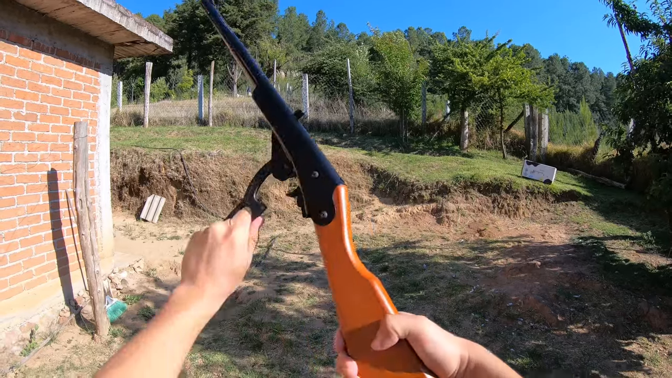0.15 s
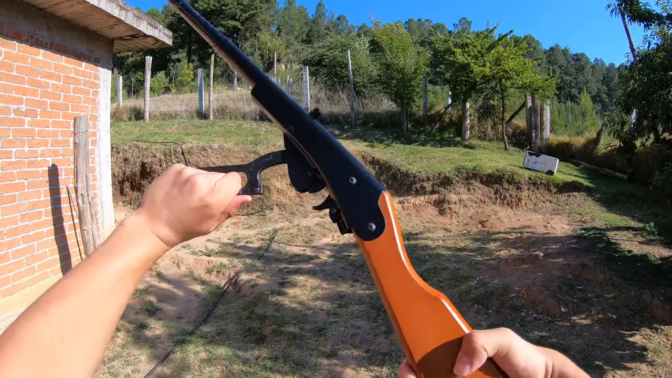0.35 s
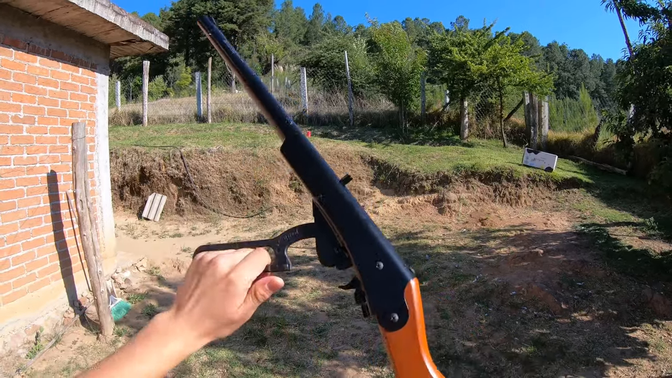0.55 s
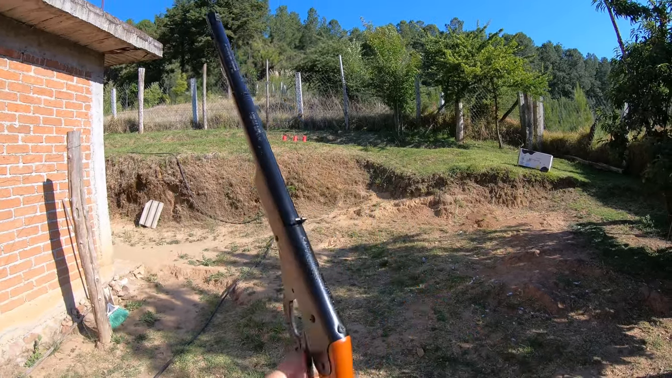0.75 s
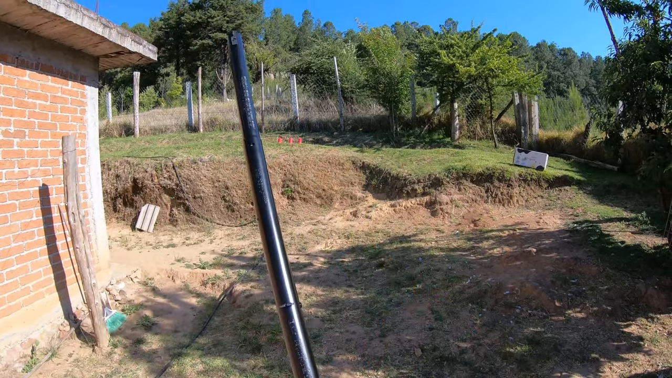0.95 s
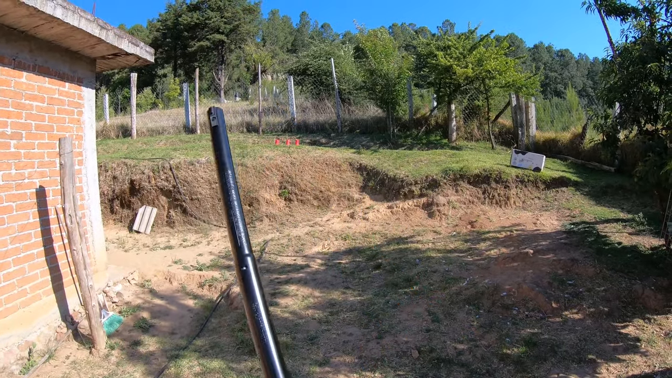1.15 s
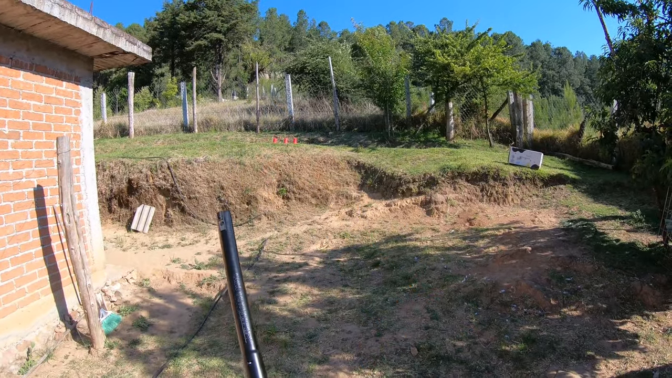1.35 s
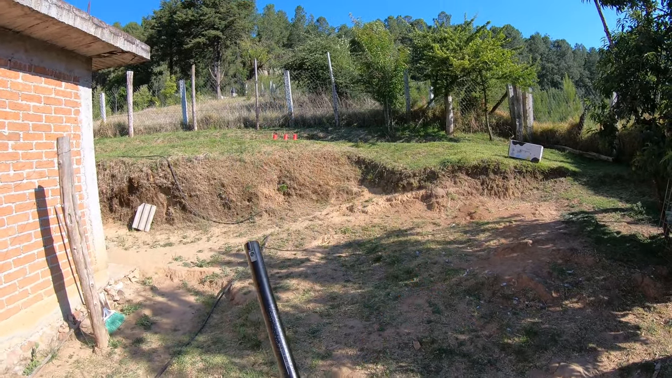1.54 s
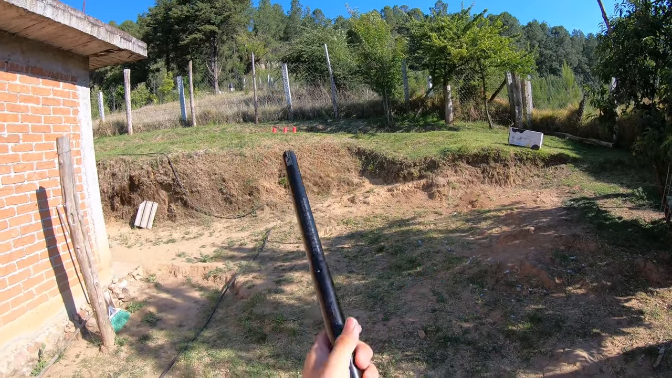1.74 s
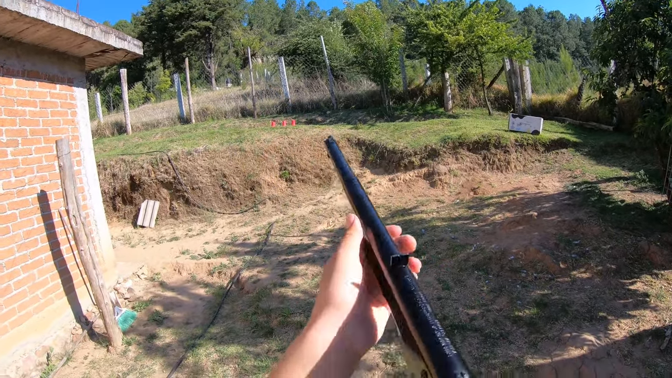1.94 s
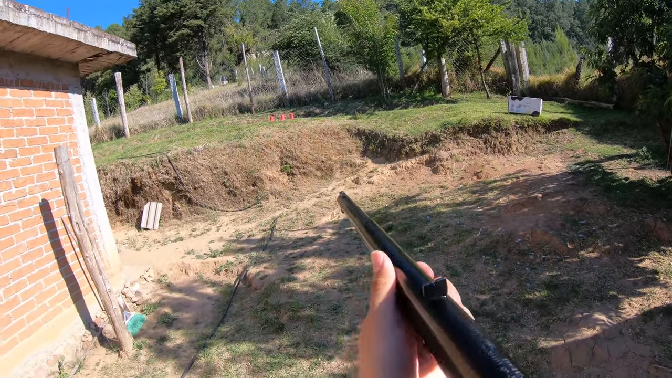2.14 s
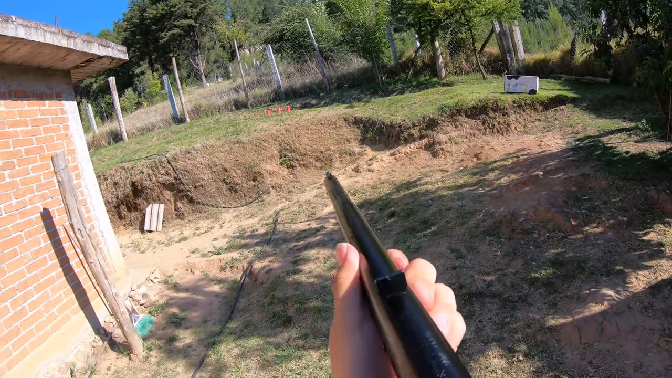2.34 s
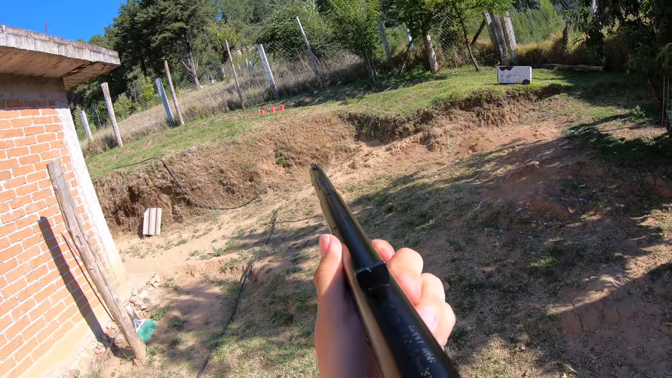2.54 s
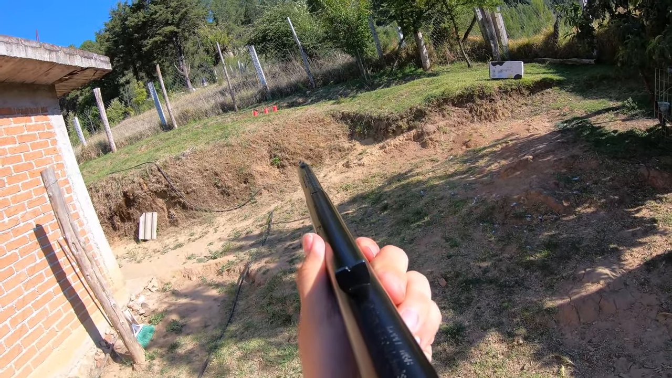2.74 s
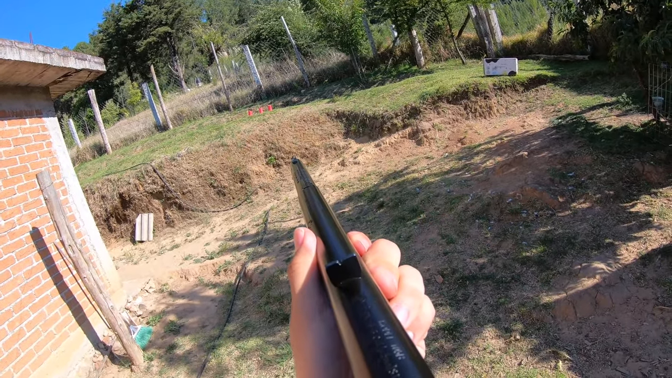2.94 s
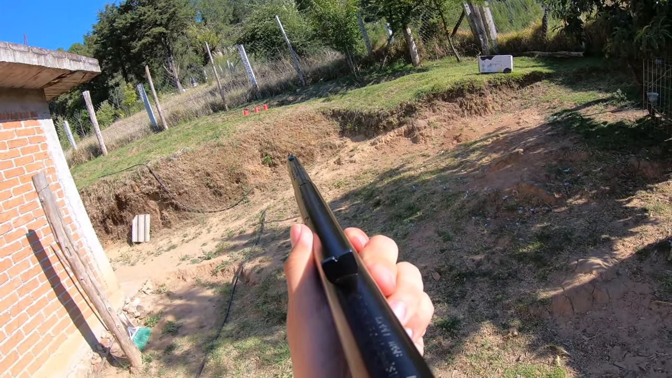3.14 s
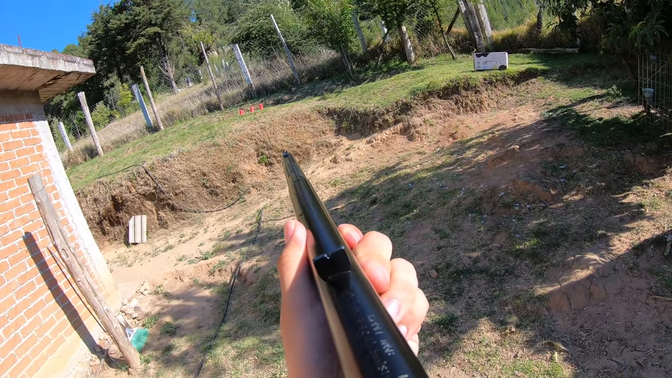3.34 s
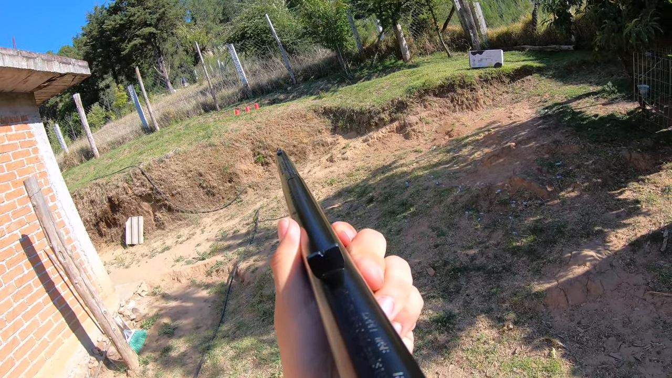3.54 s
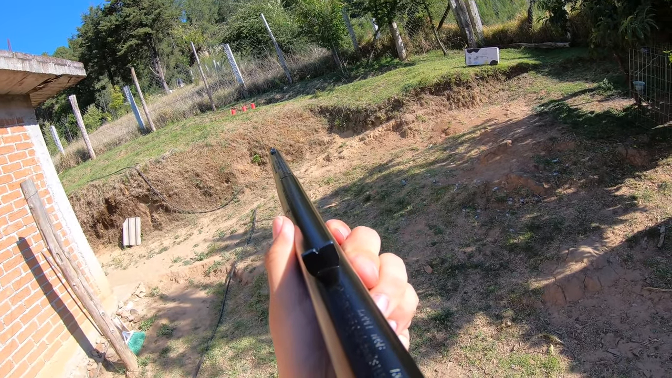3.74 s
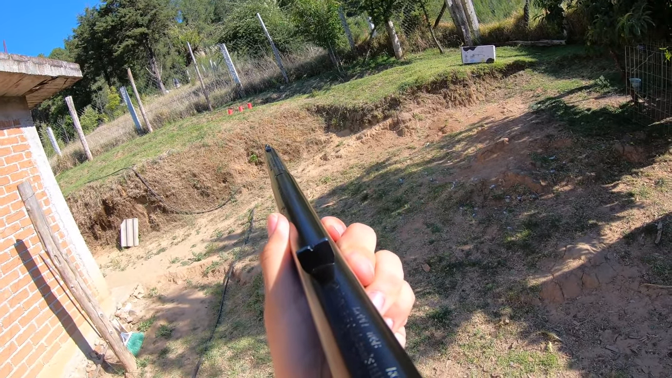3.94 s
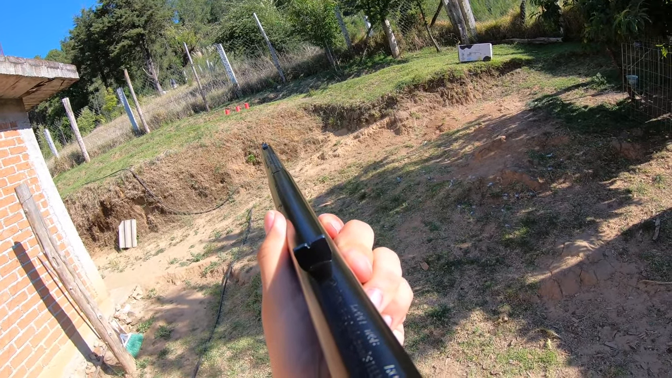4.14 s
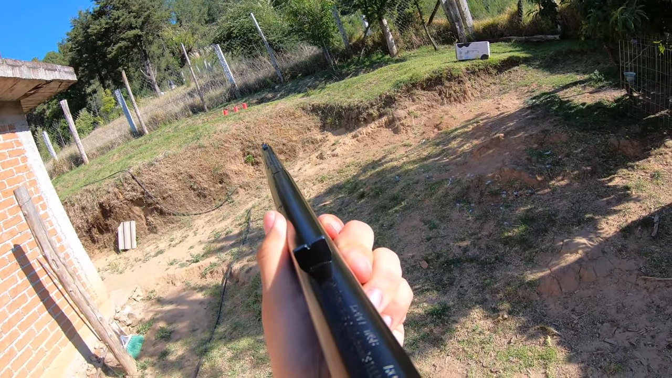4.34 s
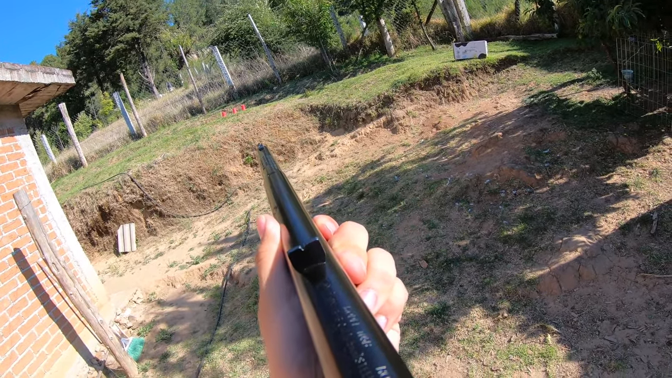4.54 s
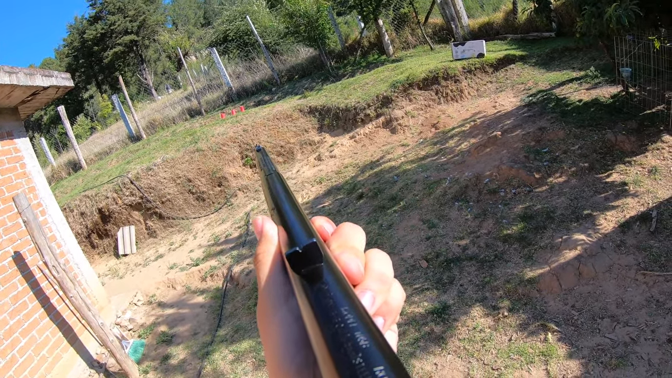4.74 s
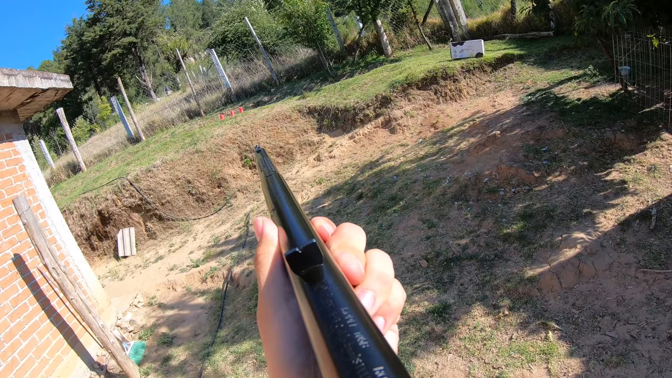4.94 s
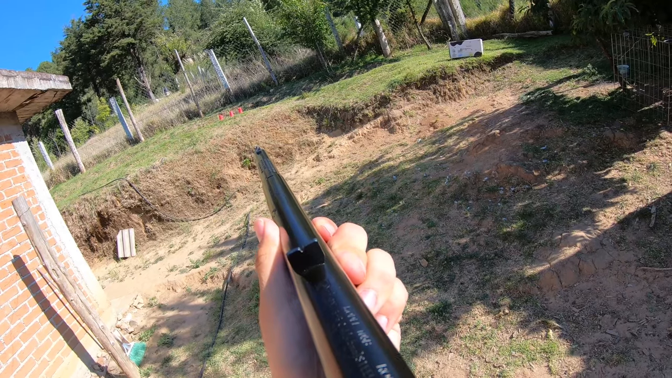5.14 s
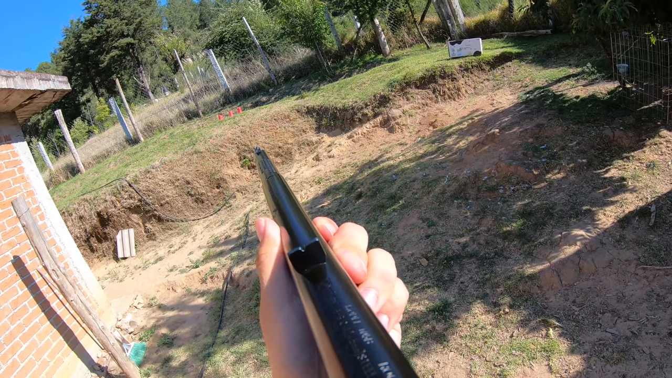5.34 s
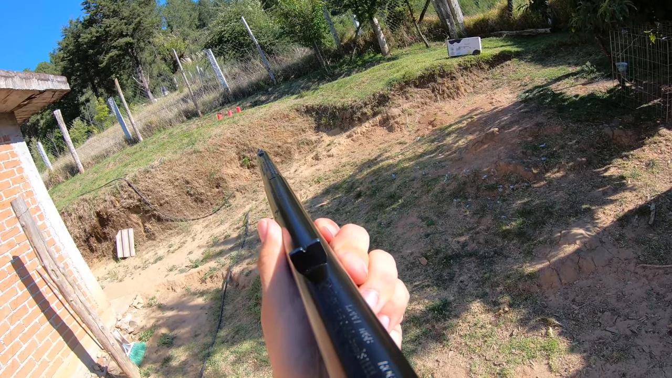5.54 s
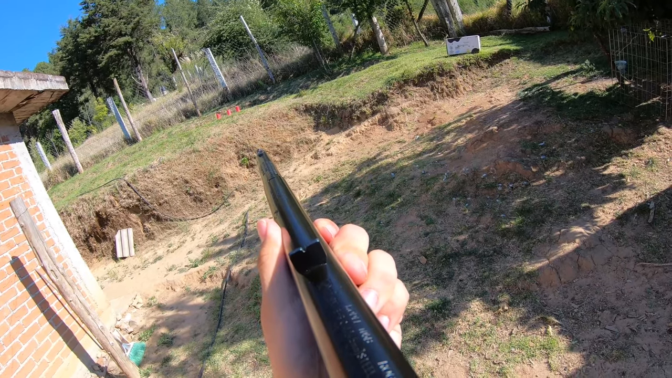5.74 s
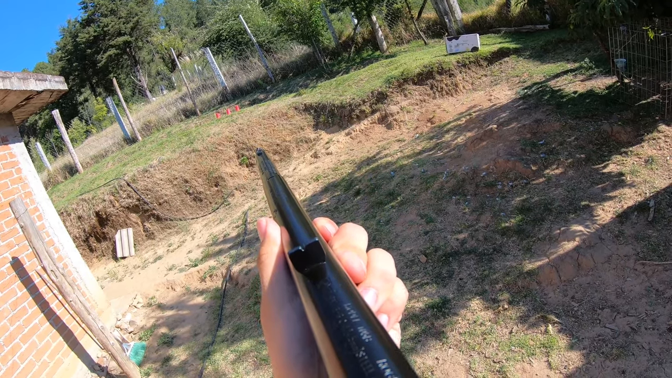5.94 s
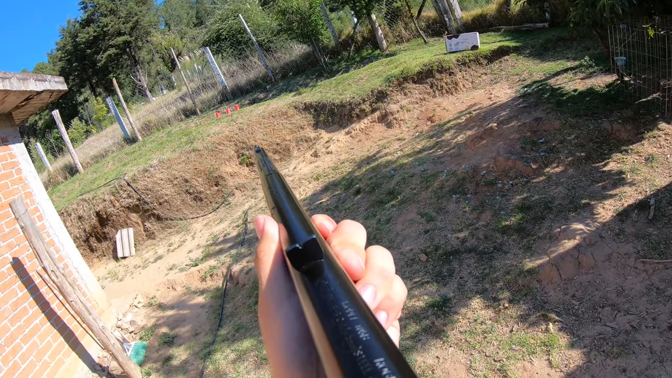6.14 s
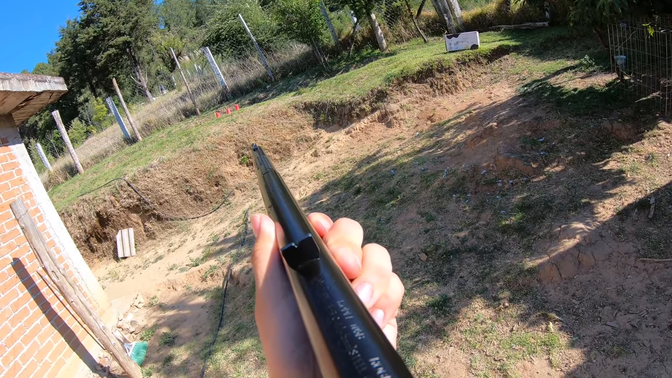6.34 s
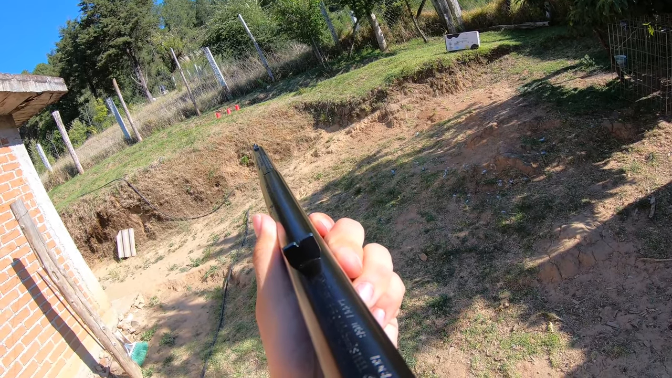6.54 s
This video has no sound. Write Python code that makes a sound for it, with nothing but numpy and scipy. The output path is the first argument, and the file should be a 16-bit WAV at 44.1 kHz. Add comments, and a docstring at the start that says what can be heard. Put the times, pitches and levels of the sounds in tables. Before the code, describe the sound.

A lever-action air gun is worked at arm's length outdoors: gritty scraping, quick bright ratchet teeth, a brief gap, then two hard clacks as the catch trips and the lever shuts. Loose parts tick and hands knock lightly. Soft crackly cloth rubbing comes next and dies away, leaving gliding bird chirps over a faint low hum and open-air rush. The sound is close and dry, with barely any echo.

```python
"""A low outdoor drone and a little wind on the microphone, then a light tick of loose parts close by.
At arm's length, in a yard beside a brick shed, a lever-action BB gun is cocked, then raised to aim:
the pawl drops and rebounds on ratchet teeth while the spring rasps, the lever trips its catch and snaps shut.
The stock rubs over a shirt in fading strokes, as bursts of tiny slips; small birds twitter in gliding tones.
Struck steel is a sum of decaying modes with chattering noise; wind, rush and rumble are coloured noise."""
import sys
import numpy as np
from scipy import signal
from scipy.fft import rfft, irfft, next_fast_len
from scipy.io import wavfile
from scipy.ndimage import uniform_filter1d

SR = 44100
rng = np.random.default_rng(int(sys.argv[2]) if len(sys.argv) > 2 else 0)


def to_wav(s):
    """Save 16-bit WAV."""
    ch = np.atleast_2d(s).T  # columns
    pcm = np.round(np.clip(ch, -1, 1) * 32767)  # PCM
    wavfile.write(sys.argv[1], SR, pcm.astype(np.int16))


N = 290396
TIME = np.arange(N) / SR   # seconds

# Modes of the struck receiver. Each row: pitch in Hz, relative level in dB, t60 in seconds.
RECEIVER_MODES = [(1080, -13, 0.066), (1440, -21.5, .015), (2240, -30.5, .025), (2852, -17.5, 0.013),
                  (3810, -6.5, 0.015), (4430, -6, .012), (4290, -5, 0.017), (4900, -7.5, 0.014),
                  (5670, -20.5, 0.036), (6450, -14, .010), (6530, -19.5, 0.01), (7674, -28, 0.012),
                  (10200, -18.5, 0.011)]
# Colour of the scrape and of the light ticks. Each row: frequency in Hz, relative density in dB per Hz.
RASP_COLOUR = [(290, -53.5), (500, -21), (800, -12.5), (1150, -12), (1600, -1.5), (2000, -7), (3200, -4.5),
               (5000, -0.5), (7400, -4), (8100, -10.5), (10000, -6.5), (11300, -19.5), (14000, -21),
               (16000, -40.5)]
# Left-right likeness of the gun. Each row: frequency in Hz, correlation from 0 to 1.
GUN_LIKENESS = [(500, 1), (1400, 0.38), (3200, 0.86), (5000, 0.27), (7000, 0.17), (10000, 0.033)]
# Left-right likeness of wind and open air. Each row: frequency in Hz, correlation from 0 to 1.
AIR_LIKENESS = [(30, .4), (80, 0.72), (250, 0.87), (700, 0.38), (1500, 0.14), (4000, 0.28), (10000, 0.033)]


def from_db(db):
    """Decibels to gain."""
    return 10 ** (np.asarray(db) / 20)


def left_right(db):
    """Gains of the two ports, db apart; the left is louder when db is positive."""
    return from_db(db * np.array([[.5], [-.5]]))


def rms_one(x):
    """Scale to unit rms."""
    return x / np.sqrt(np.mean(x ** 2) + 1e-20)


def at_hz(points, hz):
    """Read a table on a log-frequency axis."""
    f, value = np.transpose(points)
    return np.interp(np.log(hz + 1), np.log(f), value)


def level(curve):
    """Gain over time from a curve of seconds and dB, held at both ends."""
    return from_db(np.interp(TIME, *np.transpose(curve)))


def drift(rate):
    """Chance wandering of rms 1: straight lines between random values drawn rate times a second."""
    knots = rng.standard_normal(N // 8)
    return rms_one(np.interp(TIME * rate, np.arange(len(knots)), knots))


def unsteady(depth_db, per_s):
    """A gain that wavers by chance."""
    return from_db(depth_db * drift(per_s))


def add(out, s, sound):
    """Mix a short sound in at time s."""
    i = max(int(round(s * SR)), 0)
    out[..., i:i + sound.shape[-1]] += sound[..., :max(N - i, 0)]


def colour(x, spectrum):
    """Causal (minimum-phase) filter with the given spectrum; white noise keeps its power."""
    size = 2 ** 13
    gain = rms_one(from_db(at_hz(spectrum, np.arange(size // 2 + 1) * SR / size)))
    # folding the cepstrum onto positive time gives the minimum phase
    cepstrum = irfft(np.log(gain))
    cepstrum[1:size // 2] *= 2
    cepstrum[size // 2 + 1:] = 0
    impulse = irfft(np.exp(rfft(cepstrum)))
    return signal.oaconvolve(x, impulse[None], axes=-1)[:, :N]


def stereo(pair, likeness):
    """Blend two unrelated signals into left and right with a correlation for each frequency."""
    size = next_fast_len(N)
    mid, side = rfft(pair, size)
    alike = np.clip(at_hz(likeness, np.arange(len(mid)) * SR / size), -.99, .99)
    common = np.sqrt((1 + alike) / 2) * mid
    opposed = np.sqrt((1 - alike) / 2) * side * [[1], [-1]]
    return irfft(common + opposed, size)[:, :N]


def noise(likeness):
    """White stereo noise."""
    return stereo(rng.standard_normal((2, N)), likeness)


def narrow(hz, width_hz):
    """Noise in one narrow resonance; rms 1."""
    band = signal.butter(2, [hz - width_hz, hz + width_hz], "band", fs=SR, output="sos")
    return rms_one(signal.sosfilt(band, rng.standard_normal(N + SR))[SR:])   # the first second settles


def scatter(x, t60, top_hz):
    """Diffuse returns from bank, fence and trees: a decaying noise tail of unit energy."""
    t = TIME[:SR]
    tail = rng.standard_normal((2, SR)) * from_db(-60 * t / t60) * (1 - np.exp(-t / .008))
    tail = signal.sosfilt(signal.butter(1, top_hz, fs=SR, output="sos"), tail)
    return signal.oaconvolve(x, rms_one(tail) / np.sqrt(SR), axes=-1)[:, :N]


def wind(gain_db, pan_db):
    """Wind lumps on the microphone ports: low noise under a gust curve."""
    # Colour of the eddies. Each row: frequency in Hz, relative density in dB per Hz.
    eddy_colour = [(15, 6), (28, 17.5), (40, 16), (50, 11.5), (62, -3), (100, -4), (200, -23), (500, -47),
                   (4000, -74.5)]
    # Strength on the ports. Each row: time in seconds, level in dB before the wind gain.
    gusts = [(0.0, -52), (0.29, -47), (0.48, -38), (0.51, -48.5), (1.52, -57), (2.56, -50), (2.58, -62.5),
             (4.21, -56.5), (4.49, -44), (4.95, -57.5), (5.66, -51.5), (5.83, -63), (6.52, -52.5),
             (6.58, -58)]
    eddies = colour(noise(AIR_LIKENESS), eddy_colour)
    # even, so the gusts set the level
    eddies = eddies / np.sqrt(uniform_filter1d(np.mean(eddies ** 2, axis=0), size=SR // 8))
    strength = level(gusts) * unsteady(depth_db=-0.5, per_s=13)
    return from_db(gain_db) * left_right(pan_db) * strength * eddies


def drone(gain_db, side_db):
    """A low tone that wavers in pitch and throbs in strength, with a slight flutter between the ports."""
    # Swell of the drone. Each row: time in seconds, level in dB before the drone gain.
    swell = [(0.0, -75), (0.64, -52), (0.84, -72), (1.04, -50), (2.77, -68.5), (2.82, -52.5), (3.3, -74.5),
             (3.68, -49.5), (4.45, -43), (4.58, -51.5), (5.13, -55), (5.24, -39), (5.54, -48.5),
             (5.81, -40.5), (5.96, -64.5), (6.23, -44.5), (6.27, -61.5), (6.58, -45.5)]
    centre_hz, wander_hz = 77.9, 7.1   # the wander is an rms value
    pitch = centre_hz + wander_hz * drift(30)
    tone = np.sqrt(2) * np.sin(2 * np.pi * np.cumsum(pitch) / SR)
    throb = from_db(5 * np.tanh(drift(17)) - 1.5)
    flutter = from_db(side_db) * narrow(centre_hz, 15) * np.array([[1], [-1]])
    return from_db(gain_db) * level(swell) * throb * (tone + flutter)


def outdoors(rush_db, rumble_db):
    """The far rush of the countryside and a low rumble as coloured noise, with a faint hollow hum."""
    # Colours of rush and rumble. Each row: frequency in Hz, relative density in dB per Hz.
    rush_colour, rumble_colour = [(76, -30.5), (130, 4.5), (198, -4), (402, -15.5), (462, -16), (812, -6),
                                  (974, -11), (1240, -13), (2460, -27.5), (2670, -30.5), (5390, -41),
                                  (7750, -39), (9290, -44), (10300, -77), (16000, -68.5)], [(70, -20.5), (140, -1), (260, -3), (430, -2.5),
                                                      (700, -12), (1500, -39.5), (4000, -70)]
    # Levels of rush and rumble. Each row: time in seconds, level in dB before the layer's gain.
    rush_curve, rumble_curve = [(1.1, -64.5), (1.88, -64), (2.15, -65.5), (3.27, -66), (4.32, -64.5),
                                (5.6, -63.5), (6.0, -67.5), (6.58, -67)], [(1.15, -66), (3.75, -68.5), (4.07, -62.5), (4.55, -56.5),
                                              (4.66, -64.5), (5.99, -63), (6.31, -70), (6.58, -64.5)]
    # Level of the hum. Each row: time in seconds, level in dB.
    hum_curve = [(1.7, -76.5), (2.77, -73.5), (2.81, -65), (3.59, -64.5), (3.62, -75), (4.15, -55),
                 (4.25, -77), (4.35, -61), (6.58, -73.5)]
    # Resonances of the hum. Each row: centre in Hz, half-width in Hz, dB relative to the hum level.
    hum_bands = [(103, 22, 2), (170, 15, -7), (228, 12, -2)]
    rush = from_db(rush_db) * level(rush_curve) * colour(noise(AIR_LIKENESS), rush_colour)
    hum = level(hum_curve) * sum(from_db(db) * narrow(hz, width) for hz, width, db in hum_bands)
    rumble = from_db(rumble_db) * level(rumble_curve) * colour(noise(AIR_LIKENESS), rumble_colour)
    return rush + hum + rumble


def body(x):
    """Each resonance of the hollow gun lifts its own band of all that rubs on it."""
    # Resonances of the gun. Each row: centre in Hz, width in Hz, boost in dB.
    resonances = [(1290, 320, 4), (2650, 67, 7.5), (3073, 150, 6), (3700, 280, 3.5), (3940, 150, 2),
                  (4430, 380, 2), (5600, 300, 1), (6560, 320, 1.5), (7440, 330, 4.5), (8780, 490, 5.5)]
    for hz, width_hz, db in resonances:
        band = signal.lfilter(*signal.iirpeak(hz, hz / width_hz, fs=SR), x)
        x = x + (from_db(db) - 1) * band
    return x


def friction(spectrum, likeness, slips_per_s, size_db, judder_db, judder_hz, hiss_db):
    """Countless tiny slips of uneven size, bunched by stick and slip, over a smooth hiss; rms 1."""
    sizes_db = np.minimum(size_db * rng.exponential(1, N), 17)
    sizes = from_db(sizes_db) * (rng.random(N) < slips_per_s / SR)
    slips = stereo(rms_one(sizes * rng.choice([-1, 1], (2, N))), likeness)
    hiss = from_db(hiss_db) * noise(likeness)
    force = (slips + hiss) * unsteady(judder_db, judder_hz)
    return rms_one(body(colour(force, spectrum)))


def snags(spectrum, likeness, per_s, size_db):
    """Rough spots catch and let go: lone crackles, each a few ms long; rms 1."""
    decay_s = .0015   # time constant of one crackle
    sizes_db = np.minimum(size_db * rng.exponential(1, N), 6)
    clicks = from_db(sizes_db) * (rng.random(N) < per_s / SR)
    bursts = signal.lfilter([1], [1, -np.exp(-1 / (decay_s * SR))], clicks + 1e-18)
    return rms_one(body(colour(bursts * noise(likeness), spectrum)))


def strokes(rows, attack_s, release_s):
    """Gain of rubbing strokes: each swells by 20 dB in attack_s, holds, and sinks by 20 dB in release_s."""
    power = 0
    for s, hold, db in rows:
        outside = np.maximum(s - TIME, 0) / attack_s + np.maximum(TIME - s - hold, 0) / release_s
        power = power + from_db(db - 20 * np.minimum(outside, 10)) ** 2
    return np.sqrt(power)


def rasp(gain_db, pan_db):
    """The spring and lever scrape inside the receiver, then the hand slides along the gun."""
    # Friction rises as the spring is loaded and eases as the lever returns.
    # Each row: time in seconds, level in dB before the rasp gain.
    lever_curve = [(0, -60), (.16, -53), (.2, -42), (.335, -41), (.41, -32), (.45, -44), (.67, -51.5),
                   (.73, -51.5), (.85, -68)]
    # Short slides of lever and hand. Each row: start in seconds, hold in seconds, level in dB before the gain.
    slides = [(.584, 0.032, -54.5), (.708, .035, -53.5), (.77, .02, -54.5), (.885, 0.0083, -51.5),
              (.985, 0.012, -46.5), (1.05, 0.036, -58.5), (1.1, 0.13, -72), (1.255, .02, -59),
              (1.355, 0.055, -62), (1.447, 0.0093, -45), (1.58, 0.067, -66.5), (1.636, 0.0072, -63.5)]
    grain = friction(RASP_COLOUR, GUN_LIKENESS, slips_per_s=9000, size_db=3.5,
                     judder_db=3.0, judder_hz=192.8, hiss_db=-6.5)
    grit = from_db(-6) * snags(RASP_COLOUR, GUN_LIKENESS, per_s=120, size_db=3)
    lever = level(lever_curve) * (TIME < lever_curve[-1][0])
    sliding = strokes(slides, attack_s=.018, release_s=0.059)
    pressure = (lever + sliding) * unsteady(depth_db=2.55, per_s=54)
    return from_db(gain_db) * left_right(pan_db) * pressure * (grain + grit)


def ringing(modes, vary_db, skew):
    """One blow: each mode rings with its own strength; high modes reach the two ports out of step."""
    contact_s = .0001   # time that a blow takes to set a part ringing
    t, out = TIME[:SR // 4], 0
    for k, (hz, db, t60) in enumerate(modes):
        strength, phase = rng.standard_normal(2)
        apart = skew * phase * (hz / 7200) ** 2 * np.array([[1], [-1]])
        decay = from_db(db + vary_db * strength - 60 * t / t60)
        out = out + (-1) ** k * decay * np.sin(2 * np.pi * hz * t + apart)
    return out * (1 - np.exp(-t / contact_s))


def blows(rows, modes, spectrum, ring_db, chatter_db, barrel_pan_db):
    """The faces chatter as decaying noise while the struck part and the barrel tube ring in their modes."""
    # Modes of the barrel tube. Each row: pitch in Hz, relative level in dB, t60 in seconds.
    barrel_modes = [(1360, 0, .085), (1432, -11, .05), (1352, -25, .45)]
    rings, contact, t = np.zeros((2, N)), np.zeros(N), TIME[:SR // 4]
    for s, db, t60, barrel_db in rows:
        part = ringing(modes, vary_db=1.5, skew=.6)
        tube = ringing(barrel_modes, vary_db=.5, skew=.6)
        add(contact, s, from_db(db + chatter_db - 60 * t / t60))
        add(rings, s, from_db(db + ring_db) * part)
        add(rings, s, from_db(barrel_db) * left_right(barrel_pan_db) * tube)
    return rings + colour(contact * noise(GUN_LIKENESS), spectrum)


def ticks():
    """Bright ticks of loose parts and fingernails, each a very light blow on the receiver."""
    # Each row: time in seconds, level in dB before the ring and chatter gains.
    taps = [(0.0346, -33.5), (0.4543, -31), (.6135, -40), (.709, -30), (0.729, -52), (0.781, -44),
            (.9015, -36), (0.919, -38), (1.2176, -37), (1.2588, -39), (1.2685, -34), (1.2934, -40),
            (1.3581, -35.5), (1.3728, -37.5), (1.5703, -41), (1.636, -40.5), (2.381, -28.5), (2.622, -39),
            (2.827, -40), (3.629, -60), (3.678, -56.5)]
    light = [(s, db, .009, db - 30) for s, db in taps]   # chatter t60 in s, barrel 30 dB lower
    return blows(light, RECEIVER_MODES, RASP_COLOUR, ring_db=-19, chatter_db=-6, barrel_pan_db=0)


def knocks():
    """Duller knocks of the hands on the gun, ringing the receiver weakly."""
    # Each row: time in seconds, level in dB before the gains, chatter t60 in seconds, barrel ring in dB.
    bumps = [(.1322, -38.5, 0.0037, -66), (.5835, -30, 0.025, -66), (.591, -55, 0.01, -71),
             (1.146, -42.5, 0.024, -45.5), (1.346, -37, 0.024, -51), (1.428, -39.5, 0.013, -71),
             (1.939, -47.5, 0.36, -68), (2.376, -39.5, 0.07, -60), (2.4366, -32, 0.0052, -52)]
    # Colour of the contact. Each row: frequency in Hz, relative density in dB per Hz.
    spectrum = [(100, -18), (400, -16.5), (900, -3), (1600, 11.5), (2500, -3.5), (4800, -5), (8000, -18.5),
                (15000, -32.5)]
    return blows(bumps, RECEIVER_MODES, spectrum, ring_db=-21, chatter_db=-4.5, barrel_pan_db=-1.0)


def ratchet():
    """The pawl drops over each tooth; its rebound seats it and rings the barrel."""
    # Each row: drop in seconds, its level in dB before the gains, rebound delay in seconds,
    # rebound level in dB before the gains, barrel ring in dB.
    teeth = [(0.1741, -18, 0.0014, -15, -42), (0.2186, -16.5, 0.0019, -16, -39),
             (0.2511, -11.5, 0.0013, -19.5, -47), (0.2802, -16, 0.0056, -15, -31.5),
             (.3160, -14, .0045, -20.5, -32), (0.3436, -17.5, 0.0098, -19, -34),
             (0.3969, -11.5, .0052, -37, -24.5)]
    # Colour of the contact. Each row: frequency in Hz, relative density in dB per Hz.
    spectrum = [(180, -59), (300, -14.5), (433, -28), (915, -12), (994, -10.5), (1360, 0.5), (2210, -10),
                (3190, 0), (5430, -4), (7320, -3), (8360, -11), (9880, -8.5), (16000, -47)]
    drop_t60_s, rebound_t60_s = 0.019, 0.012   # chatter of the two contacts
    drops = [(s, db, drop_t60_s, -np.inf) for s, db, *_ in teeth]
    rebounds = [(s + after, db, rebound_t60_s, barrel_db) for s, _, after, db, barrel_db in teeth]
    return blows(drops + rebounds, RECEIVER_MODES, spectrum, ring_db=-7.5, chatter_db=-3.0, barrel_pan_db=11.5)


def catch():
    """The lever trips its catch: one hard contact that rings the catch briefly."""
    # Each row: time in seconds, level in dB before the gains, chatter t60 in seconds, barrel ring in dB.
    trips = [(.8670, -6, .007, -41)]
    # Modes of the catch. Each row: pitch in Hz, relative level in dB, t60 in seconds.
    modes = [(2900, -17, .008), (3480, -9, .005), (3860, -2, .007), (4190, -3, .008), (5700, -21, .007),
             (6450, -18, .007)]
    # Colour of the contact. Each row: frequency in Hz, relative density in dB per Hz.
    spectrum = [(150, -46.5), (600, -22.5), (1400, -6), (2300, -23), (3300, -9.5), (4100, 13.5),
                (4700, -4.5), (6600, -30.5), (8500, -38.5), (15000, -39.5)]
    return blows(trips, modes, spectrum, ring_db=2.5, chatter_db=-7, barrel_pan_db=-1.5)


def snap():
    """The lever snaps shut: a faint touch, then the blow that rings lever and barrel."""
    # Each row: time in seconds, level in dB before the gains, chatter t60 in seconds, barrel ring in dB.
    closings = [(.9745, -36, .006, -58), (.9759, -9, .007, -27)]
    # Modes of the lever. Each row: pitch in Hz, relative level in dB, t60 in seconds.
    modes = [(860, -8.5, 0.0059), (1050, -5, 0.01), (1800, -16, 0.033), (2010, -16, 0.017),
             (2540, -16, 0.056), (2950, -6, 0.004), (3490, -13, 0.029), (4015, -4.5, 0.015),
             (4490, -6.5, 0.011), (5480, -8.5, .008), (6000, -16, 0.02), (6300, -7.5, 0.0027),
             (7320, -9.5, 0.0039), (8600, -25.5, 0.00498)]
    # Colour of the contact. Each row: frequency in Hz, relative density in dB per Hz.
    spectrum = [(60, -27), (150, -9), (400, -16), (650, -23.5), (900, -18.5), (1500, -11), (2500, -20.5),
                (4100, -6), (5200, -25), (7450, -3.5), (8300, -30), (9400, -5), (11000, -43),
                (16000, -38.5)]
    return blows(closings, modes, spectrum, ring_db=-1.5, chatter_db=1.0, barrel_pan_db=-14.5)


def yard(x):
    """A few early reflections from ground and shed, and a faint open-air tail."""
    # Each row: delay in seconds, level in dB relative to the direct sound.
    echoes = [(.0147, -27), (.0245, -33.5), (.036, -35.5)]
    out = x + from_db(-30) * scatter(x, t60=.28, top_hz=3000)
    for k, (delay, db) in enumerate(echoes):
        add(out, delay, from_db(db) * x[::(-1) ** k])   # every other echo swaps left and right
    return out


def cloth(gain_db, pan_db, quiet_cut_hz, quiet_db, full_db):
    """The stock slides over the shirt near the microphone; quieter rubbing is duller and more hollow."""
    # The strokes weaken, then settle. Each row: start in seconds, hold in seconds, level in dB before the gain.
    rubs = [(1.72, .2, -77.5), (1.96, 0.04, -56.5), (2.02, 0.041, -47.5), (2.08, 0.044, -51.5),
            (2.15, 0.055, -48), (2.24, 0.062, -47.5), (2.35, 0.034, -48.5), (2.44, 0.031, -49),
            (2.52, 0.047, -52), (2.645, 0.045, -53.5), (2.752, 0.018, -53), (2.84, 0.39, -63.5),
            (3.25, 0.307, -64), (2.885, 0.03, -59.5), (2.98, 0.018, -62), (3.26, 0.011, -58.5),
            (3.543, 0.023, -62.5), (3.58, .1, -75.5), (4.33, 0.0073, -70), (5.61, 0.041, -69.5)]
    # Colour of the cloth. Each row: frequency in Hz, relative density in dB per Hz.
    spectrum = [(350, -70), (600, -16), (1100, -5), (1600, -1), (2300, -4), (3000, -4.5), (5000, 0.5),
                (7300, 1.5), (8000, -3.5), (10000, -7.5), (12000, -19), (14500, -23), (16000, -87)]
    # Left-right likeness of the cloth. Each row: frequency in Hz, correlation from 0 to 1.
    likeness = [(600, 0.48), (1400, 0.0000065), (3100, 0.68), (7000, 0.036), (15000, 0)]
    grain = friction(spectrum, likeness, slips_per_s=2800, size_db=7.5,
                     judder_db=1.5, judder_hz=129.0, hiss_db=3.0)
    dull = signal.sosfiltfilt(signal.butter(3, quiet_cut_hz, fs=SR, output="sos"), grain)
    hollow = from_db(quiet_db) * rms_one(body(dull))
    crackle = from_db(-7) * snags(spectrum, likeness, per_s=90, size_db=3)
    stroke = strokes(rubs, attack_s=0.042, release_s=0.055) * unsteady(depth_db=0.28, per_s=70)
    blend = np.clip(stroke / from_db(full_db), 0, 1)   # set by stroke level
    rub = blend * grain + (1 - blend) * hollow + crackle
    return from_db(gain_db) * left_right(pan_db) * stroke * rub


def whistle(length, hz, glide, overtone_db, warble):
    """One arched note gliding through its pitch, with a quick warble and a weak octave."""
    arch_octaves = 0.044   # the middle of a note bows above its straight glide
    u = np.linspace(0, 1, int(length * SR))
    arch = 4 * u * (1 - u)
    waver = np.interp(u, np.linspace(0, 1, 12), rng.standard_normal(12))
    pitch = hz * 2 ** (glide * (u - .5) + arch_octaves * (arch - 1)) * (1 + warble * waver)
    phase = 2 * np.pi * np.cumsum(pitch) / SR
    return np.sqrt(arch) * (np.sin(phase) + from_db(overtone_db) * np.sin(2 * phase))


def birds(direct_db, trees_db, flock_db, count):
    """Others overlap each leading note, their pitches drawn toward a common middle; the trees blur them all."""
    # Leading notes. Each row: start in seconds, length in seconds, pitch in Hz, glide in octaves,
    # level in dB before the direct and tree gains.
    notes = [(1.825, 0.041, 3000, -0.626, -69), (1.868, 0.039, 3390, -0.72, -68),
             (3.608, 0.088, 3256, -0.38, -70), (3.678, 0.033, 3020, 0.41, -66.5),
             (3.858, 0.055, 3540, 0, -73), (3.912, 0.034, 2980, -0.58, -67), (3.95, 0.029, 2940, -0.8, -66),
             (4.072, 0.068, 2900, -0.38, -74.5), (4.113, .035, 2990, -0.56, -68),
             (4.14, 0.0253, 3230, 0.35, -71.5), (4.265, 0.084, 3130, -0.47, -71.5),
             (4.591, 0.037, 2430, -0.61, -69.5), (4.809, 0.063, 2783, -0.2, -68),
             (4.887, 0.059, 2443, -0.39, -67.5), (4.995, 0.0394, 2210, -0.175, -63.5),
             (5.142, 0.07, 3094, -0.38, -75.5), (5.255, 0.06, 3260, 0, -74),
             (5.319, 0.051, 2670, -0.56, -64), (5.379, 0.042, 2760, -0.33, -68),
             (5.437, 0.04, 5910, -0.3, -82.5), (5.439, 0.047, 2690, -.45, -61.5),
             (5.487, 0.11, 2850, -.45, -72.5), (5.631, 0.028, 2633, -0.11, -55.5),
             (5.673, 0.075, 3310, -0.52, -74), (5.78, 0.043, 6460, -0.2, -84),
             (5.793, 0.055, 2950, -.06, -76), (5.85, 0.061, 3500, 0.048, -72.5),
             (5.91, 0.058, 2830, -0.54, -68.5), (5.983, 0.027, 2565, 0.28, -67.5),
             (6.398, 0.08, 3247, -.1, -72.5), (6.45, 0.073, 2675, -0.26, -71.5),
             (6.54, 0.06, 2540, 0.16, -71)]
    flock_hz = 3040   # the others sing around midway in octaves between this and the leading note
    lag_s, pitch_octaves, glide_octaves = .022, .13, 0.2005   # rms spread of the others, either way
    song = np.zeros((2, N))
    for s, length, hz, glide, db in notes:
        add(song, s, from_db(db) * whistle(length, hz, glide, overtone_db=-30, warble=0.032))
        # uniform draws of unit variance
        for late, aside, shift, bend in rng.uniform(-np.sqrt(3), np.sqrt(3), (count, 4)):
            other_hz = np.sqrt(hz * flock_hz) * 2 ** (pitch_octaves * shift)
            other_glide = glide + glide_octaves * bend
            note = whistle(0.97 * length, other_hz, other_glide, overtone_db=-21, warble=0.042)
            add(song, s + lag_s * late, from_db(db + flock_db) * left_right(5 * aside) * note)
    return from_db(direct_db) * song + from_db(trees_db) * scatter(song, t60=0.15, top_hz=7300)


def scene():
    """The gun in its yard, the shirt, the birds and the background."""
    air = wind(gain_db=1.06, pan_db=-4.0) + drone(gain_db=1.5, side_db=-18.5)
    air = air + outdoors(rush_db=6.0, rumble_db=-0.5)
    action = ticks() + knocks() + ratchet() + catch() + snap()
    gun = yard(rasp(gain_db=1.03, pan_db=-0.1) + action)
    shirt = cloth(gain_db=4.0, pan_db=-3.5, quiet_cut_hz=5540, quiet_db=-5.0, full_db=-51)
    flock = birds(direct_db=5.0, trees_db=-0.5, flock_db=-9.5, count=3)
    return air + gun + shirt + flock


def record(dry):
    """The microphone signal loses its top to a steep low-pass at 15.9 kHz."""
    return signal.sosfilt(signal.ellip(10, .1, 80, 15900, fs=SR, output="sos"), dry)


dry = scene()
out = record(dry)
to_wav(out)
```